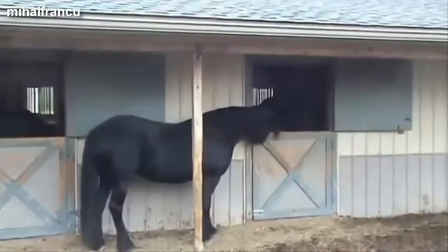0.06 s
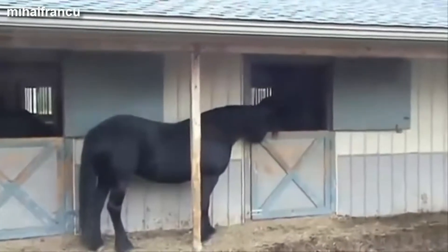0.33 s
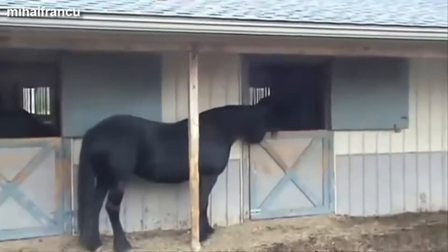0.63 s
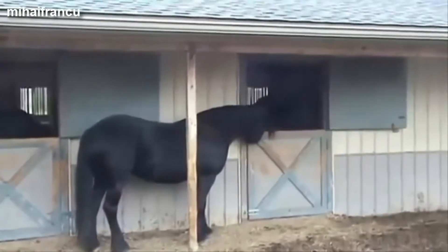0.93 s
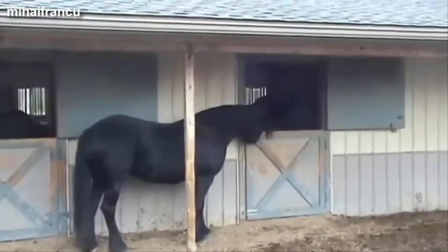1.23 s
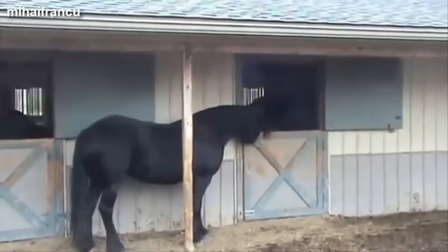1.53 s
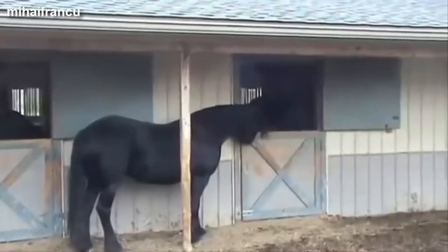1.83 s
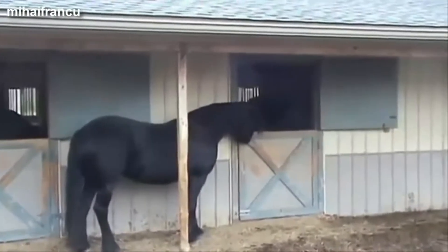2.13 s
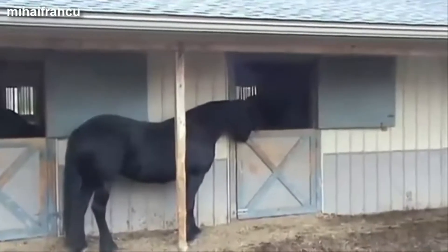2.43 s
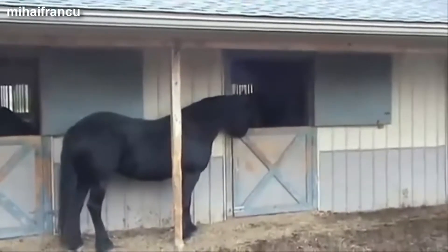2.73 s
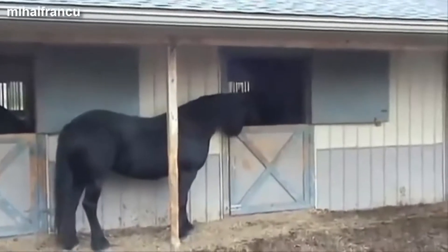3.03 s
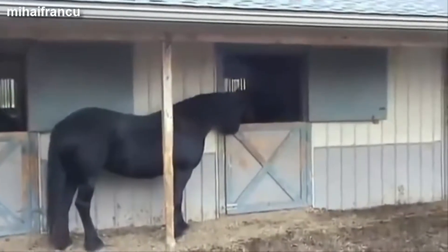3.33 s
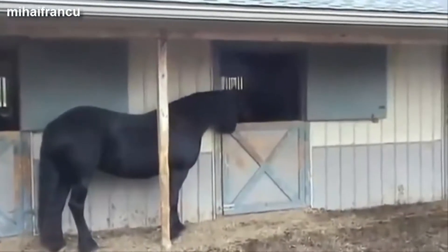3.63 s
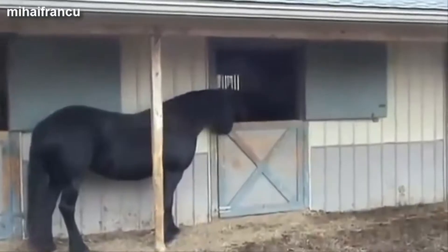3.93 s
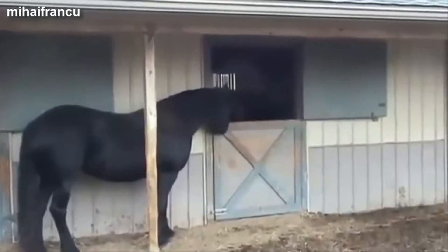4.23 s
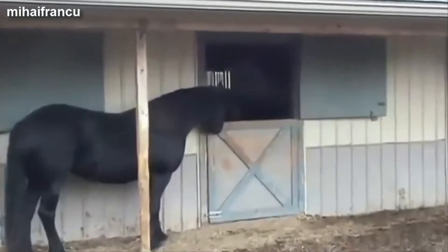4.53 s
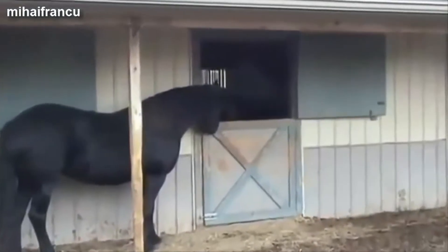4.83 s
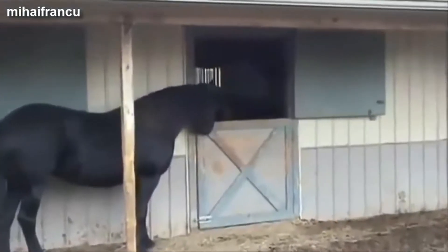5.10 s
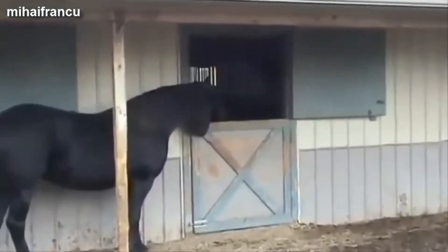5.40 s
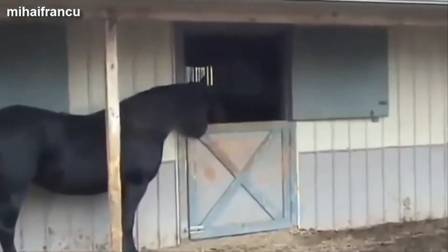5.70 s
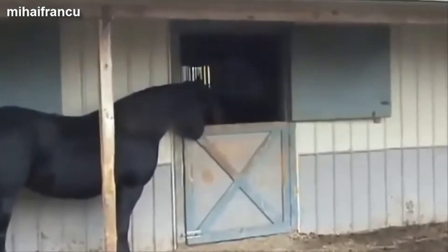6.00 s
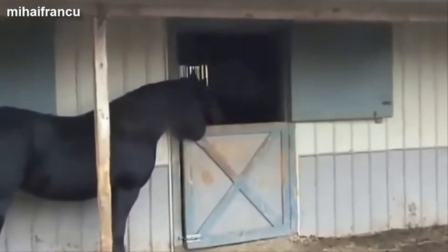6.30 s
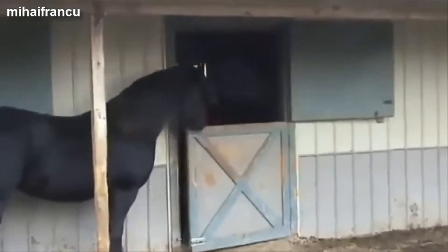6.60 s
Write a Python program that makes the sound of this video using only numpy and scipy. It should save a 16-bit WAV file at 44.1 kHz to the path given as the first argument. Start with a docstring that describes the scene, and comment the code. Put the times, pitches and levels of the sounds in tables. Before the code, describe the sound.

A wooden stable door knocks against its frame every second or so as a horse nudges it, with brief rubs and ticks from the metal latch. The stall booms slightly behind each bump. A far engine swells faintly and drops away, then the door gives a sharp, loud bang and the bolt chatters. The door is just left of centre, with quiet open air around and wind occasionally buffeting the microphone.

```python
"""Horse at a stall latch

Outdoors at a barn, the stereo microphone facing a wooden stall door. A horse works at the latch until
the bolt lets go with a bang: planks knock and rattle, the stall booms behind them, the latch clacks
and ticks. Around it lie a soft wash of air and a far engine that swells and fades, while wind gusts
and buffets right on the two microphone ports."""
import sys
import numpy as np
from scipy import signal
from scipy.fft import rfft, irfft
from scipy.io import wavfile
from scipy.ndimage import uniform_filter1d

SR = 44100
rng = np.random.default_rng(int(sys.argv[2]) if len(sys.argv) > 2 else 0)


def to_wav(s):
    """Save 16-bit WAV."""
    ch = np.atleast_2d(s).T  # columns
    pcm = np.round(np.clip(ch, -1, 1) * 32767)  # PCM
    wavfile.write(sys.argv[1], SR, pcm.astype(np.int16))


N = 297763
T = np.arange(SR * 3 // 4) / SR  # time within one struck sound

# colour of a blow on the door: f/Hz, gain/dB
WOOD_COLOUR = [(40, -32), (100, -1.5), (400, 0), (680, 2.5), (870, 0), (985, -3.5), (1090, 4), (1230, 3),
               (1420, 2), (1560, 4), (1950, -2), (2100, -1), (2800, -8), (3550, -11.5), (3850, -17),
               (4100, -14), (4450, -15), (4800, -38), (5400, -30), (6300, -20), (6900, -27), (7600, -22),
               (8100, -30), (10500, -35)]
# decay of the planks and of the stall behind them: f/Hz, t60/s
PLANK_DECAY = [(100, 0.024), (500, 0.072), (900, 0.086), (1500, 0.015), (3500, 0.023), (9000, 0.042)]
STALL_DECAY = [(100, 0.51), (300, 0.67), (1000, 0.57), (3000, 0.36), (9000, 0.017)]


def amp(db):
    """Decibels to gain."""
    return 10 ** (np.asarray(db) / 20)


def unit_rms(x):
    """Scales to an rms of one."""
    return x / np.sqrt(np.mean(x ** 2) + 1e-20)


def unit_energy(x):
    """Scales to a mean energy of one per channel."""
    return unit_rms(x) / np.sqrt(x.shape[-1])


def at_level(x, db):
    """Sets the level of the loudest few milliseconds."""
    power = uniform_filter1d((x ** 2).mean(0), size=260)
    return x * amp(db) / np.sqrt(power.max())


def lookup(points, hz):
    """Reads a table along a logarithmic frequency axis."""
    f, value = np.transpose(points)
    return np.interp(np.log(hz + 1), np.log(f + 1), value)


def fader(curve):
    """A level curve as a gain for every sample."""
    return amp(np.interp(np.arange(N) / SR, *np.transpose(curve)))


def swell(peak_s, width_s):
    """A bell of gain around its peak."""
    return np.exp(-((np.arange(N) / SR - peak_s) / width_s) ** 2)


def drift(hz):
    """Random motion of rms one, mostly slower than hz."""
    lowpass = np.exp(-(np.fft.rfftfreq(N, 1 / SR) / hz) ** 2)
    return unit_rms(irfft(rfft(rng.standard_normal(N)) * lowpass, N))


def add(mix, s, sound):
    """Mixes a sound in at time s."""
    part = mix[:, max(round(s * SR), 0):][:, :sound.shape[-1]]
    part += sound[..., :part.shape[-1]]


def colour(x, points):
    """Minimum-phase filter through points of f/Hz, gain/dB."""
    size = 4096
    log_gain = np.log(amp(lookup(points, abs(np.fft.fftfreq(size, 1 / SR)))))
    taps = np.fft.ifft(np.exp(signal.hilbert(log_gain).conj())).real[:size // 2]
    return signal.fftconvolve(x, taps[None], axes=1)[:, :x.shape[-1]]


def stereo_noise(count, side_db):
    """Two channels of noise that share their middle."""
    mid, side = rng.standard_normal((2, count))
    side = side * amp(side_db)
    return unit_rms(np.array([mid + side, mid - side]))


def microphone_hiss(level_db=-62.5):
    """Steady self-noise, unrelated on the two ports."""
    # colour of the hiss: f/Hz, gain/dB
    spectrum = [(100, -25), (2500, 4), (4500, -0.5), (6400, 1), (7000, 2.5), (7600, -2), (9790, -3),
                (10800, -7), (14000, -58), (22000, -83)]
    return amp(level_db) * unit_rms(colour(rng.standard_normal((2, N)), spectrum))


def outdoor_air(wash_db=0.5, breeze_db=-60):
    """A soft wash all around, with a restless low band as the breeze passes the barn."""
    # colour of the wash: f/Hz, gain/dB
    spectrum = [(130, -32), (220, -2), (272, -1), (325, -5), (415, -1), (530, -7), (575, -5), (645, -6),
                (864, -1.5), (1460, -6), (1580, -6), (2260, -15), (3500, -25), (6000, -42), (12000, -70)]
    # its slow rise and fall: t/s, relative level/dB
    levels = [(0.0, -54.5), (1.51, -55.5), (2.45, -52.5), (3.21, -54), (4.26, -51), (5.19, -53), (6.3, -52)]
    # likeness of left and right: f/Hz, correlation/0-1
    likeness = [(100, .7), (400, .85), (800, .74), (1500, .45), (2500, .15), (4000, .03), (10000, .04)]
    shared = lookup(likeness, np.fft.rfftfreq(N, 1 / SR))
    left, unrelated = rfft(rng.standard_normal((2, N)))
    right = shared * left + np.sqrt(1 - shared ** 2) * unrelated
    wash = unit_rms(colour(irfft(np.array([left, right]), N), spectrum))
    breeze = stereo_noise(N, side_db=-43)
    breeze = colour(breeze, [(70, 6.5), (150, 10), (400, -9), (900, -6.5), (3000, -31.5)])
    breeze = unit_rms(breeze * amp(0.17 * drift(hz=38)))
    return wash * fader(levels) * amp(wash_db + 0.67 * drift(hz=0.6)) + amp(breeze_db) * breeze


def far_engine(firing_hz=95.8, waver=0.0374, flutter_db=3.5):
    """The uneven firing note of an engine in the distance swells and drops away."""
    # the engine at the microphone: t/s, level/dB
    levels = [(0, -72), (3.2, -61), (4.75, -56.5), (5.1, -51), (5.4, -53), (5.52, -45.5), (5.56, -46.5),
              (5.62, -47.5), (5.68, -41), (5.71, -57), (6.75, -53)]
    turns = np.cumsum(firing_hz * (1 + waver * drift(hz=9.84))) / SR
    note = np.sin(2 * np.pi * turns) * amp(flutter_db * drift(hz=22))
    return unit_rms(note) * fader(levels)


def wind_gusts(draught_db=-61.5, gust_db=7.5, lumpy_db=2, left_db=0.5):
    """Gusts rise out of a light draught and rumble on the two ports."""
    # gusts on the microphone: peak t/s, half width/s, relative level/dB
    gusts = [(.6, 0.096, -47), (1.58, 0.06, -57), (2.25, 0.4, -61), (2.97, 0.13, -54), (3.98, 0.095, -55),
             (4.68, 0.22, -53.5), (5.33, 0.21, -56), (6.0, 0.21, -49), (6.55, 0.045, -53.5)]
    # colour of wind on the ports: f/Hz, gain/dB
    spectrum = [(10, -6), (30, 4.5), (70, 5), (120, -0.5), (200, -14.5), (400, -30), (1000, -35),
                (4000, -61)]
    strength = amp(draught_db) + sum(amp(db + gust_db) * swell(s, width) for s, width, db in gusts)
    rumble = unit_rms(colour(stereo_noise(N, side_db=3), spectrum))
    return rumble * strength * amp(lumpy_db * drift(hz=6.7)) * amp([[left_db], [-left_db]])


def wind_buffets(crossing_s=0.003):
    """An eddy sweeps the right port, then the left; its push on each pulls on the other."""
    # single eddies: t/s, level/dB, half width/s, pull on the other port/0-1
    eddies = [(0.606, -26, 0.0014, 0.1), (0.621, -25, 0.0028, 0.4), (0.83, -26, 0.0021, 0.52),
              (2.423, -28.5, 0.0046, 0.68), (4.389, -25, 0.0026, 0), (4.417, -21, 0.0025, 0.43),
              (5.704, -19.5, 0.0022, 0.67), (6.169, -17.5, 0.0019, 0.87)]
    out = np.zeros((2, N))
    port_delay = np.array([[crossing_s], [0]])
    for s, db, width, pull in eddies:
        passage = (np.arange(N) / SR - s - port_delay) / width
        push = (1 - passage ** 2) / (1 + passage ** 2) ** 2
        out += amp(db) * (push - pull * push[::-1])
    return out


def dense_ring(t60s):
    """Noise in which every band dies at its own speed; the bass is nearly mono."""
    # width of the door's sound between the ports: f/Hz, side/dB
    spread = [(200, -26), (800, -24), (1300, -10), (2200, -13), (3500, -13), (5000, -6), (10000, -6)]
    hz, t, (mid, side) = signal.stft(rng.standard_normal((2, len(T))), SR, nperseg=256)
    side = side * amp(lookup(spread, hz))[:, None]
    bands = np.array([mid + side, mid - side]) * amp(-60 * t / lookup(t60s, hz)[:, None])
    return unit_energy(signal.istft(bands, SR, nperseg=256)[1][:, :len(T)])


def contact_tone(x, bass_db, treble_db):
    """A heavy push adds bass, a hard contact adds treble."""
    return colour(x, [(320, bass_db), (720, 0.011), (1850, 0), (3400, treble_db)])


def wood_rubs(slips_per_s=600, grit_db=-27):
    """Wood rubs on wood: uneven little slips shake the planks."""
    # pushes of the muzzle: middle t/s, length/s, level/dB, treble/dB
    pushes = [(0.092, 0.032, -49, 2), (0.142, 0.038, -46, -10), (1.047, 0.03, -40.5, -4),
              (2.856, 0.036, -40.5, 2), (3.44, 0.02, -40.5, -8), (3.464, 0.039, -52, 5),
              (3.906, 0.015, -49.5, -4), (4.353, 0.03, -43, -6), (5.762, .03, -43, 5),
              (5.787, 0.06, -40.5, 2), (6.376, 0.049, -30.5, 6), (6.479, 0.16, -63, -4)]
    out = np.zeros((2, N))
    for s, length, db, treble_db in pushes:
        count = int(length * SR)
        slips = rng.standard_normal(count) * ((rng.random(count) < slips_per_s / SR) + amp(grit_db))
        rub = signal.fftconvolve((slips * np.hanning(count))[None], dense_ring(PLANK_DECAY), axes=1)
        rub = colour(rub, WOOD_COLOUR)
        rub = colour(rub, [(100, -1.5), (650, -9.5), (1300, -8.5), (2800, -12), (5000, -7.5)])
        add(out, s - length / 2, at_level(contact_tone(rub, 0, treble_db), db))
    return out


def hardware_ticks(stall_db=-12):
    """Loose metal touches lightly: a click and a brief ping at its own pitch."""
    # touches: t/s, level/dB, f/Hz, t60/s, ping/dB
    touches = [(0.083, -46, 1860, 0.11, -18), (0.1338, -47.5, 1470, 0.026, -12),
               (0.222, -56, 3600, 0.047, -10), (0.5162, -37.5, 3940, 0.04, -6),
               (0.9588, -51, 1980, 0.12, -19), (2.619, -53, 3900, 0.018, -14),
               (2.6787, -52, 2370, 0.038, -15), (3.338, -59.5, 2750, 0.038, 10),
               (3.798, -54, 3380, 0.023, -21), (3.9029, -52, 3980, 0.075, -9), (3.999, -52, 4000, 0.06, -8),
               (4.257, -58, 4830, 0.037, -9), (4.3592, -44, 2300, 0.019, 0), (6.313, -42, 1440, 0.072, -17),
               (6.55, -48, 2610, 0.22, -9)]
    out = np.zeros((2, N))
    for s, db, hz, t60, ping_db in touches:
        fade = amp(-60 * T / t60)
        click = unit_energy(stereo_noise(len(T), side_db=-6) * fade)
        click += amp(stall_db) * dense_ring(STALL_DECAY)
        peak = [(hz / 8, -14), (hz / 2, -3), (hz, 0), (hz * 1.25, -5), (hz * 2, -14), (20000, -50)]
        ping = amp(ping_db) * unit_energy(np.sin(2 * np.pi * hz * T) * fade)
        add(out, s, at_level(unit_energy(colour(click, peak)) + ping, db))
    return out


def latch_clacks(chatter_t60=0.021, ring_t60=0.032, high_db=-5, stall_db=-17):
    """A brief chatter of hard parts sets two short modes ringing."""
    # dry hollow clacks: t/s, level/dB, low f/Hz, high f/Hz, treble/dB, low mode/dB, rise/s
    clacks = [(0.5144, -30, 1087, 1690, 0, 5, .001), (4.039, -41, 1070, 1500, 5, -3, .0004),
              (4.3587, -35, 665, 1737, 10, 3, 0.0017), (6.5954, -31, 874, 1240, 5.5, -7, 0.0022),
              (6.599, -39, 917, 1110, -1, -12, 0.0013), (6.6989, -29, 770, 1890, 13.5, -3, 0.00065)]
    # colour of the latch: f/Hz, gain/dB
    spectrum = [(60, -24), (400, -5.5), (680, 3), (1000, 2.5), (1900, 2), (2700, -14), (4200, -24.5),
                (5000, -27.5), (10000, -37)]
    out = np.zeros((2, N))
    for s, db, low_hz, high_hz, treble_db, low_db, rise in clacks:
        chatter = unit_energy(stereo_noise(len(T), side_db=-4.5) * amp(-60 * T / chatter_t60))
        chatter += amp(stall_db) * dense_ring(STALL_DECAY)
        clack = unit_energy(contact_tone(colour(chatter, spectrum), 0, treble_db))
        for hz, ring_db in (low_hz, low_db), (high_hz, high_db):
            clack += amp(ring_db) * unit_energy(np.sin(2 * np.pi * hz * T) * amp(-60 * T / ring_t60))
        add(out, s, at_level(clack * (1 - np.exp(-T / rise)), db))
    return out


def bolt_rattles(hits_per_s=900, ring_t60=0.081, clatter_db=-5):
    """A hard blow leaves bolt and hinges chattering: a dying shower of tiny metal hits."""
    # showers of hits: t/s, level/dB, t60/s
    showers = [(0.521, -54, 0.19), (5.772, -64, 0.2), (6.359, -41, 0.29)]
    # modes of the bolt: f/Hz, relative level/dB
    modes = [(3480, 12), (5530, 5), (6150, -1), (6400, 5), (7600, -8)]
    out = np.zeros((2, N))
    ring = unit_energy(sum(amp(db - 60 * T / ring_t60) * np.sin(2 * np.pi * hz * T) for hz, db in modes))
    for s, db, t60 in showers:
        hits = stereo_noise(len(T), side_db=-10) * amp(-60 * T / t60)
        hits *= rng.random(len(T)) < hits_per_s / SR
        clatter = unit_energy(colour(hits, [(1500, -44), (4000, -2), (6000, -8), (10500, -10)]))
        ringing = unit_energy(signal.fftconvolve(hits, ring[None], axes=1)[:, :len(T)])
        add(out, s, at_level(ringing + amp(clatter_db) * clatter, db))
    return out


def low_thuds(rise_s=0.0021, overtone=1.3, overtone_db=-7, boom_db=-7):
    """Low hollow thuds: the door panel swinging, and two early bumps of wind on the microphone."""
    # thuds (wind at 0.603 and 0.826 s): t/s, level/dB, f/Hz, t60/s
    thuds = [(0.553, -43, 380, 0.077), (0.603, -42, 163, 0.13), (0.826, -45, 174, 0.059),
             (2.011, -38.5, 104, 0.13), (2.013, -47, 208, 0.13), (2.865, -40.5, 101.5, 0.14),
             (2.874, -41, 314, 0.17), (3.446, -46, 370, .13), (3.915, -43, 141, 0.096),
             (3.974, -42.5, 115, 0.091), (4.361, -45.5, 165, 0.18), (5.807, -37.5, 220, 0.07),
             (5.826, -44.5, 302.5, 0.38), (6.372, -33, 135, 0.047), (6.398, -34.5, 195.5, 0.081)]
    out = np.zeros((2, N))
    for s, db, hz, t60 in thuds:
        notes = np.sin(2 * np.pi * hz * T) + amp(overtone_db) * np.sin(2 * np.pi * hz * overtone * T)
        peak = [(hz / 3, -20), (hz, 0), (hz * overtone, -2), (hz * 4, -30)]
        boom = unit_energy(colour(dense_ring(STALL_DECAY), peak))
        thud = unit_energy(notes * amp(-60 * T / t60)) + amp(boom_db) * boom
        add(out, s, at_level(thud * (1 - np.exp(-T / rise_s)), db))
    return out


def bending_lag(x, lag_s=0.01674, corner_hz=260):
    """Bending waves are slow in the bass, so the boom of the door trails its crack."""
    hz = np.fft.rfftfreq(2 * len(T), 1 / SR)
    turns = lag_s * corner_hz * np.arctan(hz / corner_hz)
    return irfft(rfft(x, 2 * len(T)) * np.exp(-2j * np.pi * turns))[:, :len(T)]


def door_ring(spot_hz, favour_db=4):
    """The door rings; modes that move most at the struck spot are favoured."""
    # modes of the door: f/Hz, relative level/dB, t60/s
    modes = [(104.5, -0.5, 0.53), (182, -6.5, 0.61), (219.8, -8, 0.64), (284.7, -2.5, 0.57),
             (453, 2.5, 0.25), (536, -19, 0.36), (600, -7.5, 0.16), (656, -4, 0.39), (700, -1.5, 0.14),
             (846, -8, 0.37), (1104, -1.5, 0.17), (1219, -1.5, 0.11), (1273, -2.5, 0.14), (1484, -11, 0.12),
             (1562, -13, 0.16), (1735, 9.5, 0.06), (1850, 12, 0.068), (1954, -3.5, 0.12), (2246, -3, 0.14),
             (2404, 8, 0.094), (2890, 2.5, 0.25), (3170, 6.5, 0.13), (3250, 12, 0.052), (3510, 0.5, 0.11),
             (4100, -9, 0.22), (4280, -7, 0.26)]
    hz, db, t60 = np.transpose(modes)[:, :, None]
    db = db + favour_db * np.exp(-(np.log(hz / spot_hz) / 0.21) ** 2)
    phase = rng.random((len(modes), 1))
    partials = amp(db - 60 * T / t60) * np.sin(2 * np.pi * (hz * T + phase))
    return unit_energy(partials.sum(0))


def door_knocks(crack_db=-4, stall_db=-5, spot_db=3.5, stall_rise_s=0.018):
    """The door bumps its frame and rebounds: a crack, plank clatter, door ring and stall boom."""
    # blows: t/s, level/dB, bass/dB, treble/dB, ring and boom/dB, rise/s, f/Hz the struck spot favours
    blows = [(0.5145, -35.5, 2, -9, -4, 0.0013, 1160), (0.537, -45, -13, -10, -11, 0.002, 1150),
             (2.0033, -32, 6, -6.5, -13.5, 0.00063, 810), (2.029, -43.5, 9, -6, -19, 0.0015, 900),
             (2.051, -57, 19, -16, -17, 0.001, 700), (2.855, -39, 9.5, -6, -6.5, 0.00046, 705),
             (2.891, -48.5, 8.5, -28, -6, 0.00087, 850), (3.406, -48, 10, -9, -7, 0.0003, 1100),
             (3.438, -40, 9, -2, -9.5, 0.00083, 720), (3.461, -39.5, -1, -21, -14.5, 0.0021, 760),
             (5.508, -39.5, 10.5, -12, -11.5, 0.00045, 1320), (5.774, -32, -1, -7, -11.5, 0.0015, 700),
             (5.794, -44.5, 4.5, 1, -2, 0.002, 680), (5.8443, -42, 11, 0, -26, 0.00023, 1400),
             (6.335, -29, 5.5, 1, -10, 0.0023, 1410), (6.3573, -15.5, -1.5, 10, -11.5, 0.0001, 1700),
             (6.383, -31, -3, 1, -13, 0.001, 1800), (6.4184, -31, 4, 4.5, -34, 0.0012, 1500),
             (6.4266, -35, -3, -5, -18, 0.0006, 1100), (6.476, -41, -9, -4, -8, 0.0011, 1200),
             (6.627, -44, 8, -11, -16, 0.0032, 690)]
    out = np.zeros((2, N))
    for s, db, bass_db, treble_db, boom_db, rise, spot_hz in blows:
        stall = unit_energy(dense_ring(STALL_DECAY) * (1 - np.exp(-T / stall_rise_s)))
        blow = dense_ring(PLANK_DECAY) + amp(boom_db) * (door_ring(spot_hz) + amp(stall_db) * stall)
        blow *= 1 - np.exp(-T / rise)
        blow[:, 0] += amp(crack_db) * np.exp(-rise / 0.0021)  # only a sudden contact cracks
        blow = colour(blow, [(spot_hz / 2, 0), (spot_hz, spot_db), (spot_hz * 2, 0)])
        blow = contact_tone(colour(blow, WOOD_COLOUR), bass_db, treble_db)
        add(out, s, at_level(bending_lag(blow), db))
    return out


def scene():
    """The door stands a touch left of the microphone's axis; air and wind surround it."""
    front = door_knocks() + low_thuds() + bolt_rattles()
    front += latch_clacks() + hardware_ticks() + wood_rubs()
    front *= amp([[0.3], [-0.3]])
    return front + outdoor_air() + microphone_hiss() + far_engine() + wind_gusts() + wind_buffets()


def record(dry):
    """The recorder's band limit cuts off the top treble."""
    lowpass = signal.firwin(511, cutoff=10930, window=("kaiser", 9), fs=SR)
    return signal.oaconvolve(dry, lowpass[None], "same")


dry = scene()
out = record(dry)
to_wav(out)
```